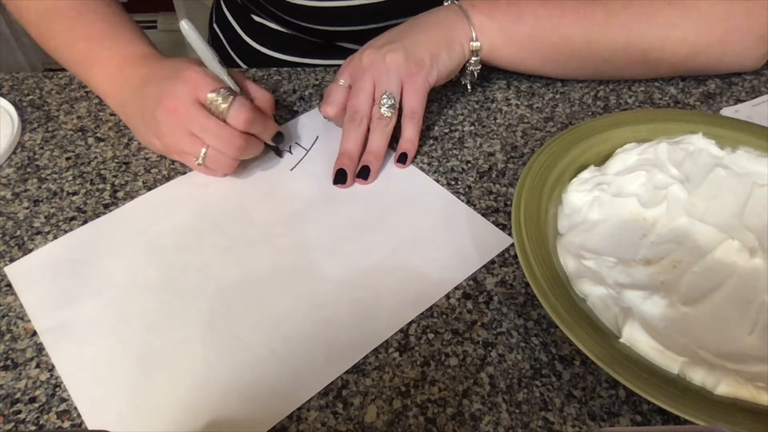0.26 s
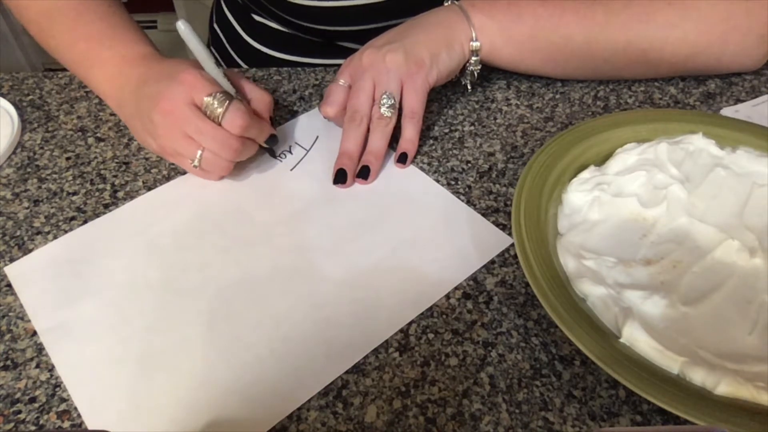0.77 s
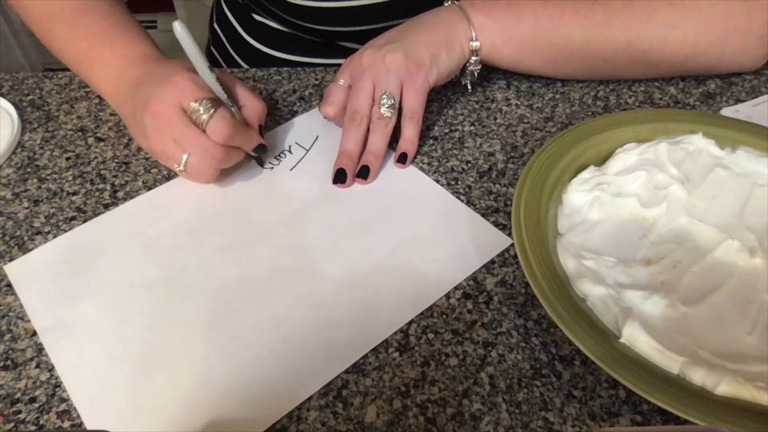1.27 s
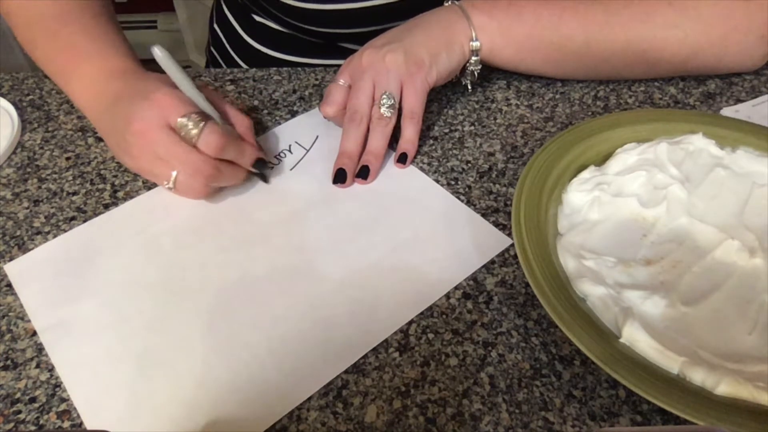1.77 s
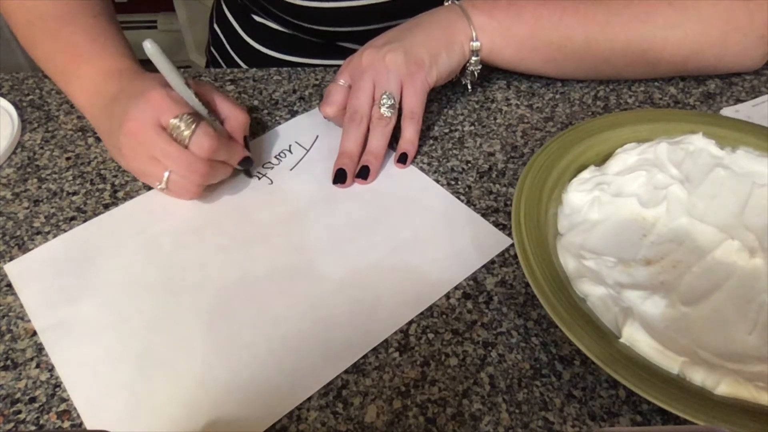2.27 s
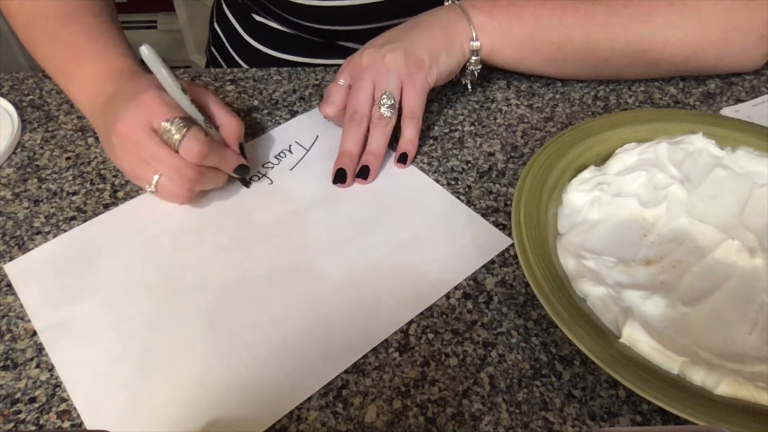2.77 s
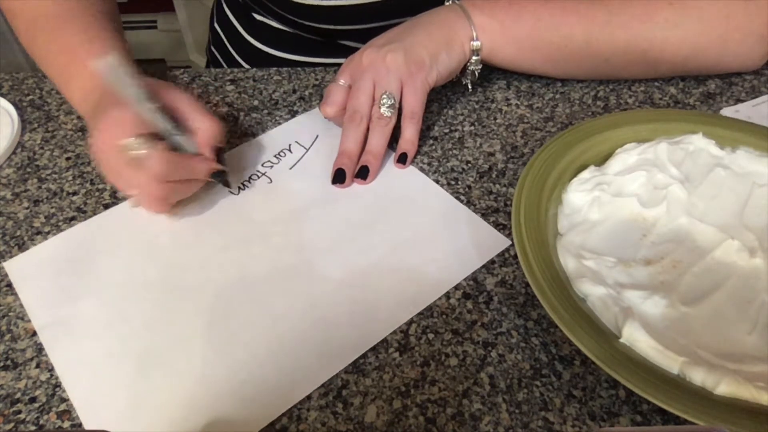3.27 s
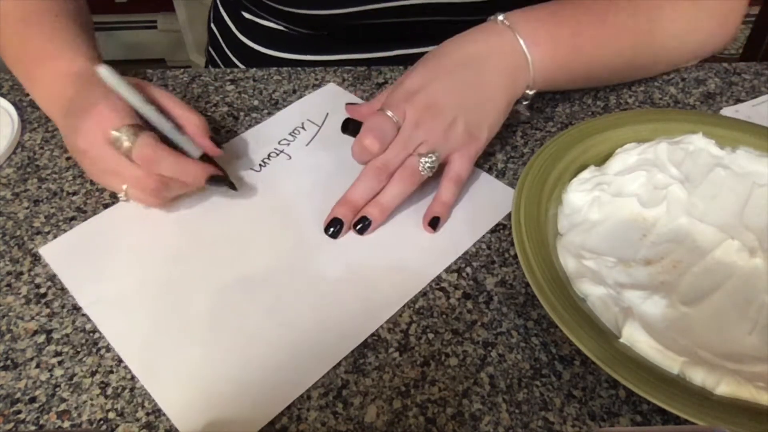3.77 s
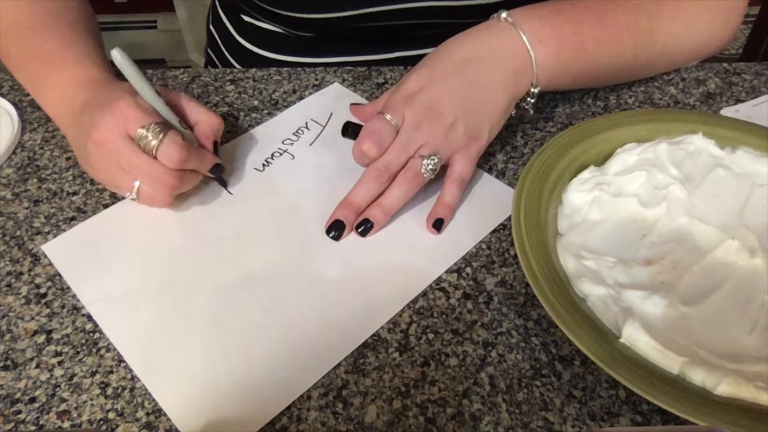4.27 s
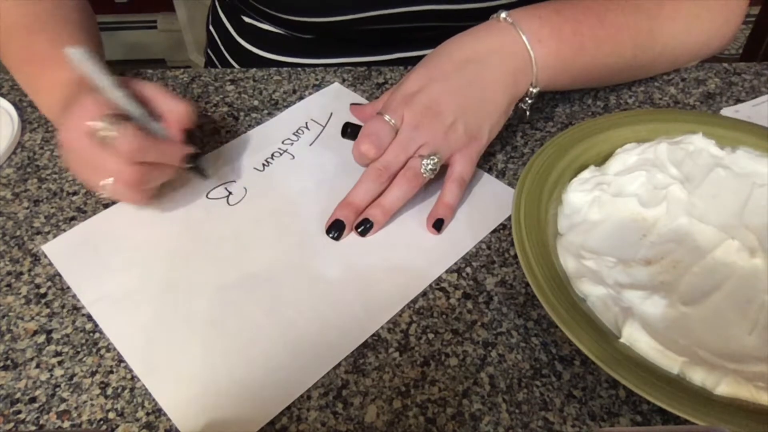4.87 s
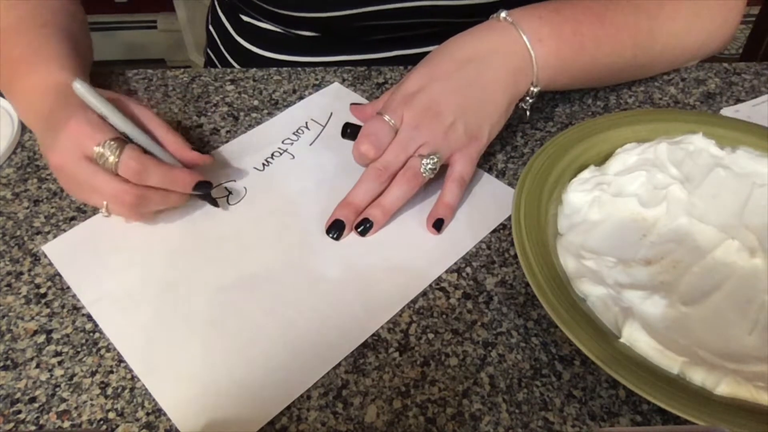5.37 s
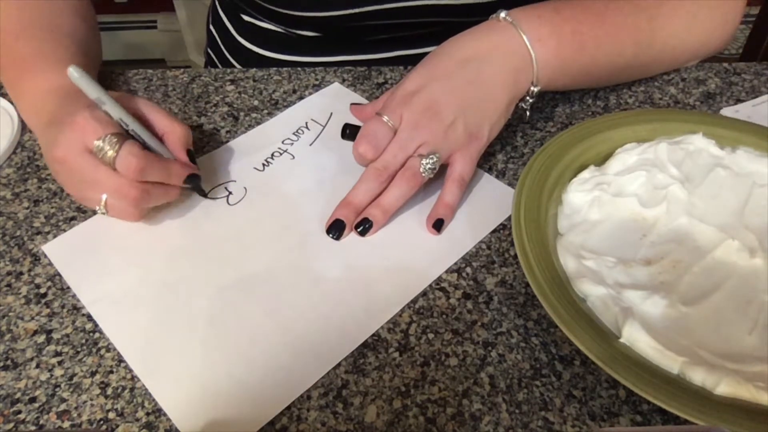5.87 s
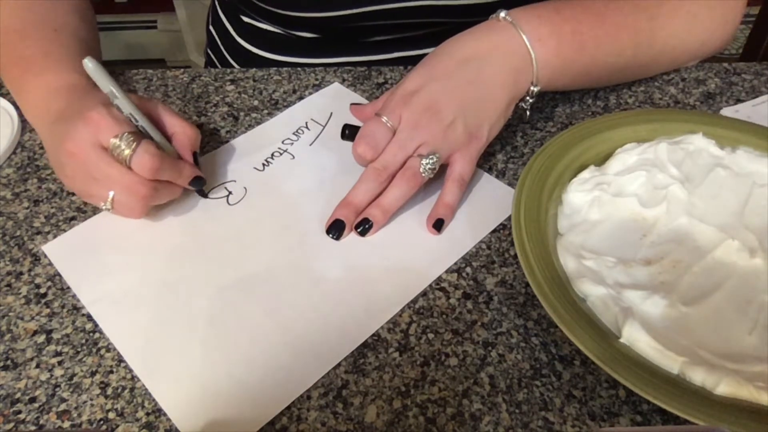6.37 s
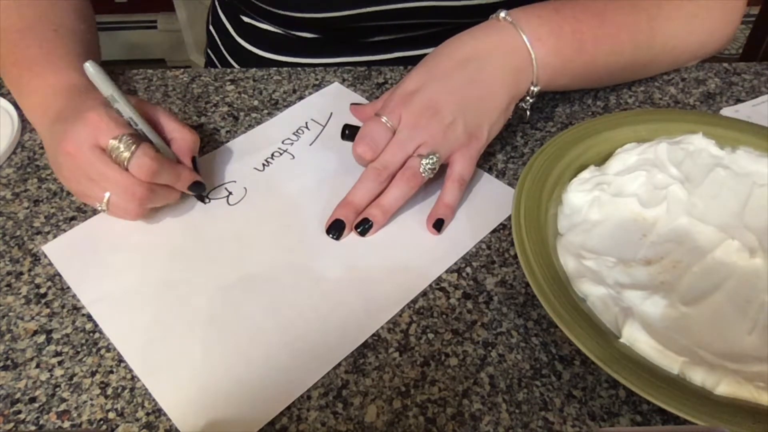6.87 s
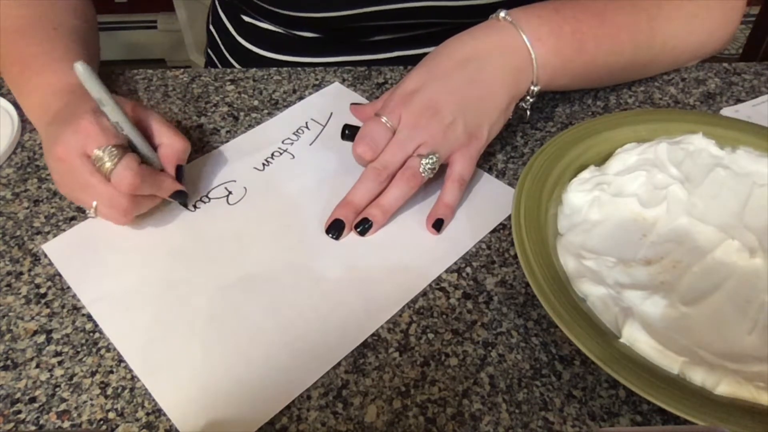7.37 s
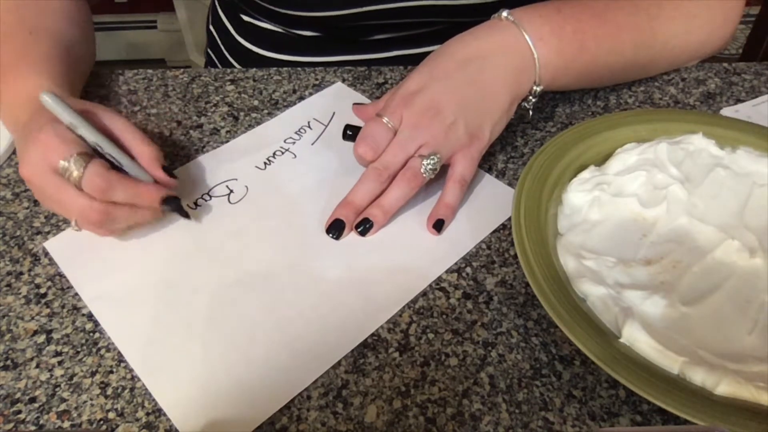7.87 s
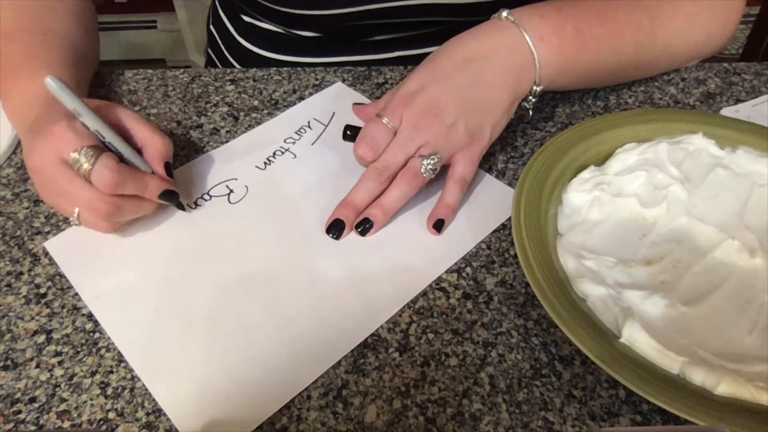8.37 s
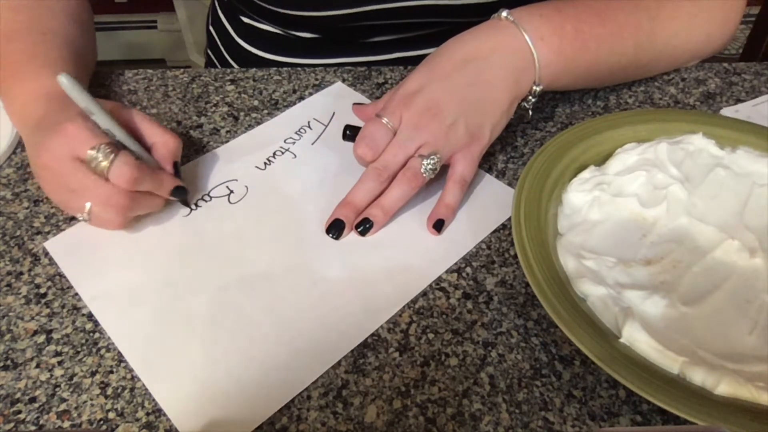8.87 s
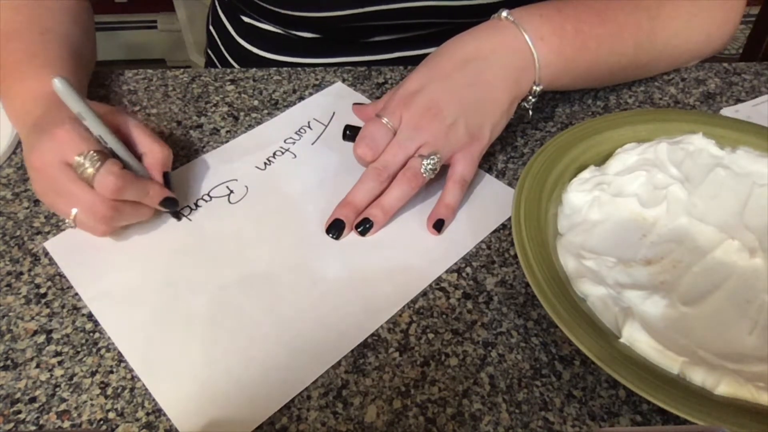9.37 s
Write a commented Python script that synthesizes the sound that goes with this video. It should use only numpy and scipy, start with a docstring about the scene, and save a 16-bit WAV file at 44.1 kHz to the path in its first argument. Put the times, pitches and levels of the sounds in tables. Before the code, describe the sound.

A felt-tip marker scratches across paper in short strokes over a low appliance hum and room rumble.

```python
"""Felt-tip marker on paper

A marker writes a few words on a sheet lying on a stone kitchen counter. The nib ticks as it lands
and plucks paper fibres in short strokes, each louder and brighter where it moves fastest.
Hand and sheet slide between words, and faint thin squeaks sound in the pauses.
An appliance hums over the low rumble of the room."""
import sys
import numpy as np
from scipy import signal
from scipy.fft import rfft, irfft, next_fast_len
from scipy.io import wavfile

SR = 44100
rng = np.random.default_rng(int(sys.argv[2]) if len(sys.argv) > 2 else 0)


def bounce(signal):
    """Save signal as a 16-bit WAV file at the path given by the first command-line argument."""
    frames = np.transpose(np.atleast_2d(signal))
    limited = np.clip(frames, -1, 1)
    pcm = np.round(limited * 32767).astype(np.int16)
    wavfile.write(sys.argv[1], SR, pcm)


N = 424241


def from_db(db):
    """Decibels to gain."""
    return 10 ** (np.asarray(db) / 20)


def unit_rms(x):
    """Scale to rms 1."""
    return x / np.sqrt(np.mean(x ** 2) + 1e-20)


def band(x, low_hz, high_hz, order=2):
    """Butterworth band-pass."""
    sos = signal.butter(order, [low_hz, high_hz], "band", fs=SR, output="sos")
    return signal.sosfilt(sos, x + 1e-18)


def drift(rate_hz):
    """Smooth random curve, rms 1: noise low-passed at rate_hz."""
    hop, settle = 20, 4000
    pole = np.exp(-2 * np.pi * rate_hz * hop / SR)
    noise = rng.standard_normal(N // hop + settle + 2)
    slow = signal.lfilter([1], [1, -2 * pole, pole * pole], noise)[settle:]
    return np.interp(np.arange(N) / hop, np.arange(len(slow)), unit_rms(slow))


def colour(x, spectrum):
    """Shape x by (f/Hz, level/dB) points, rolled off past both ends; rms 1."""
    size = next_fast_len(N)
    hz = np.maximum(np.arange(size // 2 + 1) * SR / size, 1)
    points_hz, points_db = np.transpose(spectrum)
    rolloff = np.minimum(hz / points_hz[0], 1) ** 2 * np.minimum(points_hz[-1] / hz, 1) ** 6
    gain = rolloff * from_db(np.interp(np.log(hz), np.log(points_hz), points_db))
    return unit_rms(irfft(rfft(x, size) * gain, size)[:N])


def movement(start_s, length_s, fastest, land_s, lift_s):
    """One touch: sample indices, contact gate, and a speed that peaks at 1 at fastest * length_s."""
    first = max(int((start_s - land_s) * SR), 0)
    end = min(int((start_s + length_s + 10 * lift_s) * SR), N)
    at = np.arange(first, end)
    t = at / SR - start_s
    gate = np.clip(t / land_s + .5, 0, 1) * np.exp(-np.maximum(t - length_s, 0) / lift_s)
    peak_s = fastest * length_s
    arch = np.sin(np.interp(t, [0, peak_s, length_s], [0, np.pi / 2, np.pi]))
    slowest = np.where(t < peak_s, 0.48, 0.28)  # start and end speed
    return at, gate, slowest + (1 - slowest) * arch


def friction_gains(touches, land_s, lift_s):
    """Body gain follows speed; edge (top band) gain follows speed ** 1.5."""
    body, edge = np.zeros((2, N))
    for start_s, length_s, fastest, level_db, edge_db in touches:
        at, gate, speed = movement(start_s, length_s, fastest, land_s, lift_s)
        body[at] = np.maximum(body[at], gate * speed * from_db(level_db))
        edge[at] = np.maximum(edge[at], gate * speed ** 1.5 * from_db(level_db + edge_db))
    return body, edge


def fibre_snaps(per_s, spread_db, clump_db, clump_hz):
    """Fibres catch and let go at random, stronger where the paper is rougher."""
    sizes = from_db(spread_db * np.minimum(rng.exponential(1, N), 4))
    signs = rng.choice([-1, 1], N)
    snaps = rng.random(N) < per_s / SR
    return snaps * sizes * signs * from_db(clump_db * drift(clump_hz))


def friction(grain, body, edge, bite):
    """Grain in three bands: the top swells with edge and draws the middle along, as far as bite sets."""
    low = band(grain, 200, 6500, order=4)
    middle = band(grain, 6500, 11200, order=4)
    top = band(grain, 11200, 16500, order=4)
    middle_gain = ((edge + 1e-7) / (body + 1e-7)) ** bite
    treble_rms = np.sqrt(np.var(band(low, 3500, 6500)) + np.var(middle) * middle_gain ** 2)
    return body * (low + middle_gain * middle) / treble_rms + edge * unit_rms(top)


# Air rumble and hiss spectra: f/Hz, relative level/dB
RUMBLE_SPECTRUM = [(12, -4), (22, 1.5), (42, -3), (53, -11), (73, -5), (105, -8.5), (150, -17), (210, -22),
                   (300, -27), (480, -35), (680, -33), (1200, -40.5), (1900, -47), (2600, -59)]
HISS_SPECTRUM = [(1500, -8), (3000, 3), (4400, 3), (6000, -2), (8300, 1), (11000, -9), (13000, -4),
                 (15000, 4), (16000, 1)]


def room_air(rumble_db, waver_db, hiss_db):
    """Wavering rumble of moving air and a faint even hiss."""
    rumble_gain = from_db(rumble_db + waver_db * drift(1.8))
    rumble = rumble_gain * colour(rng.standard_normal(N), RUMBLE_SPECTRUM)
    return rumble + from_db(hiss_db) * colour(rng.standard_normal(N), HISS_SPECTRUM)


# Hum lines: f/Hz, rms level/dB
HUM_LINES = [(119.9, -34), (179.9, -61), (239.8, -64.5), (359.7, -71), (479.5, -72), (582, -75), (673, -72)]


def appliance(waver_db, wander_rad):
    """Hum at twice the mains rate, with weak, less steady lines above it."""
    t, out = np.arange(N) / SR, np.zeros(N)
    for hz, level_db in HUM_LINES:
        phase = 2 * np.pi * (hz * t + rng.random())
        phase += wander_rad * hz / HUM_LINES[0][0] * drift(2.2)
        out += np.sqrt(2) * from_db(level_db + waver_db * drift(9)) * np.sin(phase)
    return out


# Squeak glides: t/s, length/s, first f/Hz, last f/Hz, level/dB
SQUEAKS = [(5.823, 0.051, 14700, 15700, -76.5), (6.245, 0.069, 15100, 14700, -69),
           (8.128, 0.069, 15550, 15550, -64.5), (8.281, .09, 15500, 15600, -66),
           (8.683, .035, 15500, 14400, -76)]


def squeaks(jitter_hz, flutter_db):
    """Thin, unsteady whistles that swell and fade as they glide."""
    out = np.zeros(N)
    jitter, flutter = jitter_hz * drift(150), flutter_db * drift(60)
    for start_s, length_s, first_hz, last_hz, level_db in SQUEAKS:
        at, gate, swell = movement(start_s, length_s, fastest=.4, land_s=.004, lift_s=.003)
        hz = np.interp(at / SR - start_s, [0, length_s], [first_hz, last_hz]) + jitter[at]
        tone = np.sqrt(2) * np.sin(2 * np.pi * np.cumsum(hz) / SR)
        out[at] += gate * swell * from_db(level_db + flutter[at]) * tone
    return out


# Shifts of the hand: t/s, length/s, level/dB
SCUFFS = [(0.452, 0.3, -61), (3.883, 0.2, -59), (5.428, 0.14, -57)]


def scuffs(low_hz, high_hz):
    """The soft heel of the hand rubs dully on the sheet."""
    out = np.zeros(N)
    rub = unit_rms(band(rng.standard_normal(N), low_hz, high_hz, order=3))
    for start_s, length_s, level_db in SCUFFS:
        at, gate, speed = movement(start_s, length_s, fastest=.4, land_s=.03, lift_s=.02)
        out[at] += from_db(level_db) * gate * speed * rub[at]
    return out


# Hand and sheet slides: t/s, length/s, fastest point/share of length, level/dB, edge/dB re level
SLIDES = [ (2.250, 0.15, 0.47, -58.5, 0.5), (2.370, 0.16, .15, -65, -9), (2.470, 0.099, 0.3, -65.5, -1.5),
          (3.205, 0.23, 0.23, -72, -0.5), (3.378, .135, 0.72, -60, 7.5), (3.505, 0.079, .15, -69, 9),
          (3.700, 0.14, 0.43, -72.5, 1), (3.780, 0.041, 0.13, -60.5, 0.5), (3.820, 0.26, 0.081, -73.5, -16),
          (8.970, 0.17, .1, -70.5, -7), (9.090, 0.079, 0.28, -66.5, -3.5)]
# Rub spectrum: f/Hz, relative level/dB
RUB_SPECTRUM = [(400, 4), (800, 9), (1500, 9), (2200, 3), (3000, -0.5), (5000, 0.5), (6200, -4.5),
                (8000, 2.5), (9600, -1), (11000, -18.5), (13000, -8.5), (15500, -1)]


def sliding():
    """Skin on paper and paper on stone: a broad, fine-grained rub."""
    body, edge = friction_gains(SLIDES, land_s=0.0069, lift_s=0.018)
    snaps = fibre_snaps(per_s=13000, spread_db=-4.0, clump_db=0.9, clump_hz=230)
    return friction(colour(snaps, RUB_SPECTRUM), body, edge, bite=0.88)


# Nib landings and barrel ticks in the grip: t/s, gain/dB, crack trim/dB
TICKS = [(1.9644, -54, -13), (3.0679, -43.5, -11), (3.7454, -51, -9), (3.7863, -46, -14), (4.554, -47, -8),
         (4.5979, -41.5, -17), (6.0097, -41, -21), (6.1085, -42.5, -35), (7.2489, -49, -13),
         (8.8233, -48, -8), (9.3846, -52, -16)]
# Struck barrel modes: f/Hz, relative level/dB, t60/s
TICK_MODES = [(1410, -3, .02), (1633, -3.5, 0.026), (1920, -7, 0.017), (2250, -23, 0.011),
              (2720, -14.5, 0.03), (3070, -5.5, 0.008), (3980, -12, 0.0097)]


def ticks(soft_s, crack_s, crack_db, knock_db):
    """Each tick rings the barrel under a short crack; felt and skin soften the blow."""
    out, t = np.zeros(N + SR), np.arange(SR // 10) / SR
    hz, mode_db, t60_s = np.transpose(TICK_MODES)[:, :, None]
    attack = 1 - np.exp(-(t / soft_s) ** 2)
    for start_s, gain_db, trim_db in TICKS:
        strength = from_db(mode_db + rng.normal(0, 1.5, hz.shape))
        phase = 2 * np.pi * (hz * t + rng.random(hz.shape))
        knock = np.sum(strength * from_db(-60 * t / t60_s) * np.sin(phase), axis=0)
        crack = band(rng.standard_normal(len(t)) * np.exp(-t / crack_s), 5000, 11000, order=4)
        tick = from_db(knock_db) * knock + from_db(crack_db + trim_db) * crack
        at = int(start_s * SR)
        out[at:at + len(t)] += from_db(gain_db) * tick * attack
    return out[:N]


# Barrel resonance, freer as the grip loosens: t/s, level/dB re plain scratch
BARREL_RING = [(0, -5), (1.3, 11), (3.2, 0), (4.5, 2), (6.6, 11), (9.6, 5)]
# Nib and barrel resonances: f/Hz, width/Hz, level/dB re plain scratch
PEN_MODES = [(1500, 520, -5.5), (3400, 430, -3), (4380, 270, -5), (6200, 140, -17), (7630, 50, 2),
             (8210, 120, 3.5), (8660, 98, 1), (13600, 720, -7.5), (14500, 250, -6), (15250, 580, -4.5)]


def pen_ring(grain, barrel_hz, barrel_width_hz, swing_db, swing_hz):
    """The pen's resonances swell and fade as grip and angle change."""
    barrel_gain = from_db(np.interp(np.arange(N) / SR, *np.transpose(BARREL_RING)))
    barrel = band(grain, barrel_hz - barrel_width_hz / 2, barrel_hz + barrel_width_hz / 2, order=1)
    out = grain + barrel_gain * barrel
    for hz, width_hz, level_db in PEN_MODES:
        ring = band(grain, hz - width_hz / 2, hz + width_hz / 2, order=1)
        out += from_db(level_db + swing_db * drift(swing_hz)) * ring
    return out


def hand_echo(x, delay_s, swing_share, echo_db):
    """A near reflection, its path changing as the hand moves, combs the scratch."""
    n = np.arange(N)
    lag = delay_s * SR * (1 + swing_share * drift(2.3))
    return x + from_db(echo_db) * np.interp(n - lag, n, x)


# Pen strokes: t/s, length/s, fastest point/share of length, level/dB, edge/dB re level
STROKES = [ (0.003, 0.068, 0.27, -57.5, 2), (0.115, 0.078, 0.33, -67, -2), (0.175, .045, .4, -71.5, 5),
           (0.270, 0.033, .2, -70.5, 8), (0.295, 0.12, 0.39, -65.5, -7), (0.415, 0.084, 0.85, -61, -3),
           (0.525, 0.13, .2, -72, -2.5), (0.720, .06, .55, -69.5, 0), (0.822, 0.14, 0.92, -62.5, 0.5),
           (1.005, 0.062, .3, -78, 1), (1.140, 0.039, 0.44, -67, 3), (1.208, 0.078, 0.44, -66.5, 4),
           (1.295, 0.069, 0.63, -55, 4), (1.778, .05, 0.76, -67, 2), (1.825, .105, 0.41, -62.5, 1.5),
           (1.955, 0.04, .5, -72, 7), (2.058, 0.075, .6, -65.5, -1.5), (2.183, 0.085, 0.18, -67.5, -5),
           (2.585, 0.095, 0.77, -69.5, -1), (2.795, 0.057, .4, -71.5, -4), (2.890, .07, .25, -62.5, 0.5),
           (2.965, 0.061, .5, -64.5, 1), (3.065, 0.075, .2, -57.5, 2.5), (3.125, 0.073, 0.32, -60, 0),
           (4.175, 0.099, 0.23, -66.5, -4.5), (4.380, .115, 0.64, -60.5, 4.5), (4.490, .07, 0.91, -59, 5),
           (4.587, 0.11, 0.074, -60, 4.5), (4.686, 0.085, 0.6, -51.5, 9.5),
           (5.318, 0.036, 0.62, -76.5, 3.5), (6.438, 0.023, .1, -64, 6), (6.508, 0.11, 0.33, -64, -4),
           (6.585, 0.12, 0.46, -61, 0.5), (6.860, 0.13, .55, -66.5, -7), (6.940, 0.096, 0.5, -60.5, -1.5),
           (7.150, 0.052, 0.95, -68.5, -5), (7.248, 0.076, .15, -65.5, 1), (7.315, 0.076, 0.46, -65, -2),
           (8.778, 0.048, 0.31, -64, 6), (8.822, 0.077, 0.2, -61.5, 1), (8.890, 0.083, 0.41, -60, -1),
           (9.333, 0.05, .3, -70, 3), (9.380, 0.11, .45, -65, -5), (9.470, 0.13, 0.26, -64.5, -1.5)]
# Fibre snap spectrum: f/Hz, relative level/dB
FIBRE_SPECTRUM = [(500, -14), (1000, 4.5), (1900, -1), (2600, -7), (4000, -2.5), (5700, -4.5), (8000, -2.5),
                  (9700, -2), (11000, -16), (12500, -8), (14200, -2), (15600, 0)]


def marker():
    """Dense fibre snaps ring through nib and barrel while the pen is down."""
    body, edge = friction_gains(STROKES, land_s=.004, lift_s=.014)
    snaps = fibre_snaps(per_s=11000, spread_db=2.8, clump_db=1.6, clump_hz=60)
    grain = colour(snaps, FIBRE_SPECTRUM)
    grain = pen_ring(grain, barrel_hz=1733, barrel_width_hz=200, swing_db=8.0, swing_hz=8.5)
    grain = hand_echo(grain, delay_s=.00128, swing_share=.05, echo_db=-9)
    return friction(grain, body, edge, bite=.7)


def kitchen(x, t60_s, wet_db, early_db):
    """Three reflections from the counter and nearby surfaces, then a short diffuse tail."""
    t = np.arange(SR // 2) / SR
    decay = from_db(-60 * t / t60_s) * (t > .006)
    tail = band(rng.standard_normal(len(t)), 300, 10000, order=1) * decay
    response = from_db(wet_db) * tail / np.sqrt(np.sum(tail ** 2))
    for k, delay_s in enumerate((.0013, .0023, .0041)):
        response[int(delay_s * SR)] += from_db(early_db) * (-1) ** k
    return x + signal.fftconvolve(x, response)[:N]


def scene():
    """Writing in the kitchen over hum and room air; mono."""
    taps = ticks(soft_s=.0007, crack_s=.002, crack_db=4, knock_db=2)
    whistles = squeaks(jitter_hz=120, flutter_db=3)
    writing = marker() + sliding() + scuffs(low_hz=580, high_hz=1330) + taps + whistles
    writing = kitchen(writing, t60_s=0.48, wet_db=-9.5, early_db=-20)
    hum = appliance(waver_db=1.12, wander_rad=0.055)
    air = room_air(rumble_db=-36.5, waver_db=0.66, hiss_db=-82)
    return (air + hum + writing)[None]


def record(dry):
    """Steep elliptic low-pass at 15750 Hz."""
    return signal.sosfilt(signal.ellip(12, .2, 70, 15750, fs=SR, output="sos"), dry)


dry = scene()
out = record(dry)
bounce(out)
```